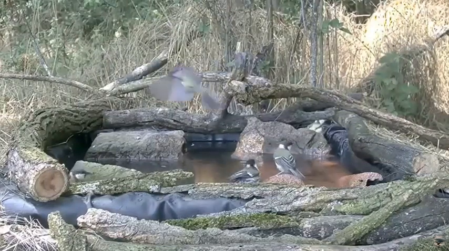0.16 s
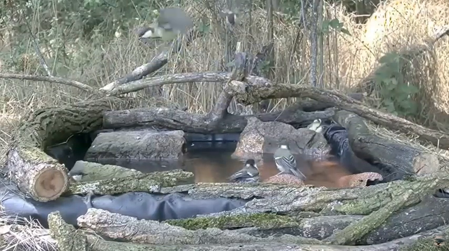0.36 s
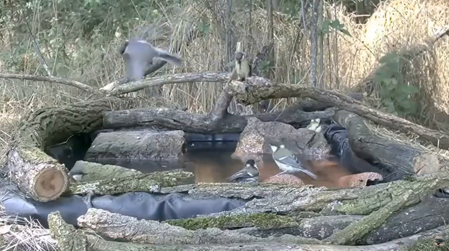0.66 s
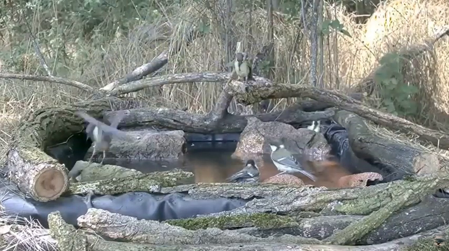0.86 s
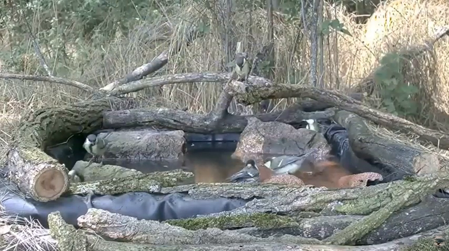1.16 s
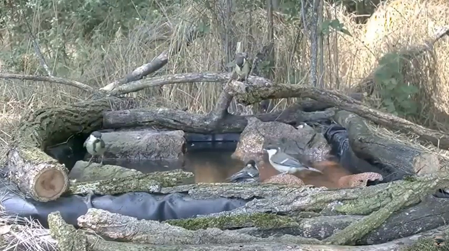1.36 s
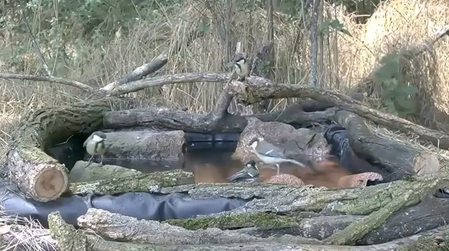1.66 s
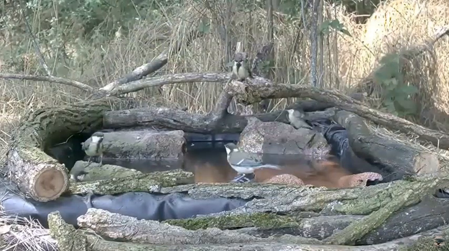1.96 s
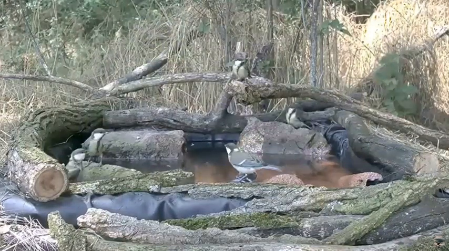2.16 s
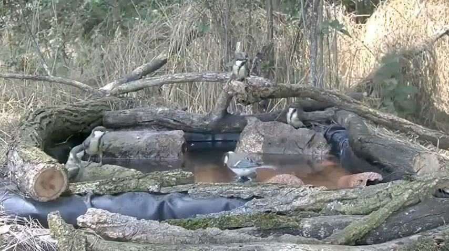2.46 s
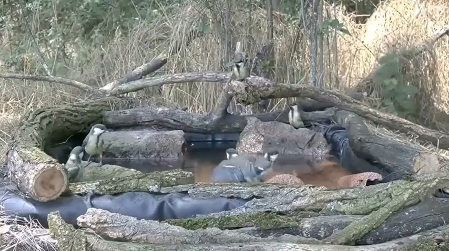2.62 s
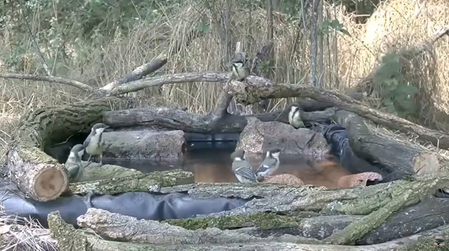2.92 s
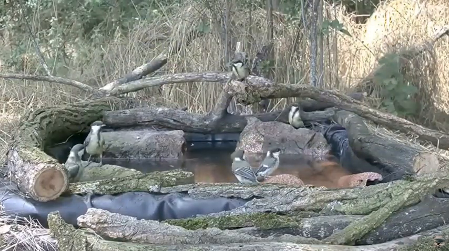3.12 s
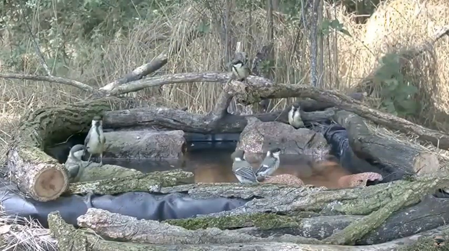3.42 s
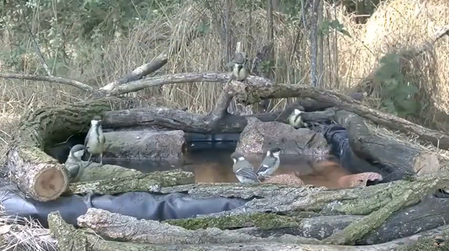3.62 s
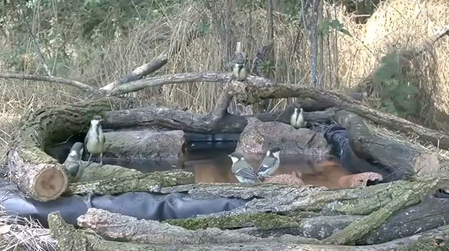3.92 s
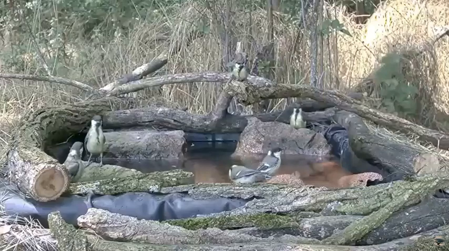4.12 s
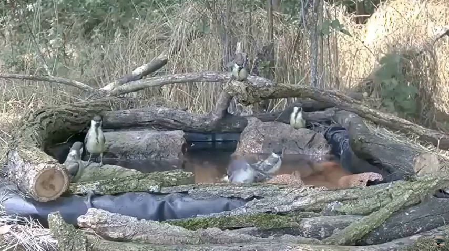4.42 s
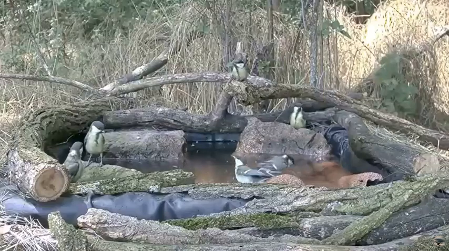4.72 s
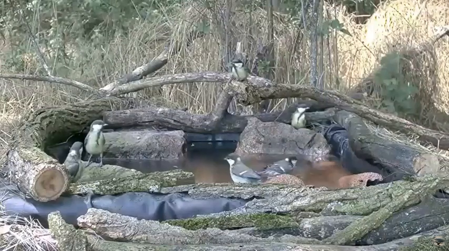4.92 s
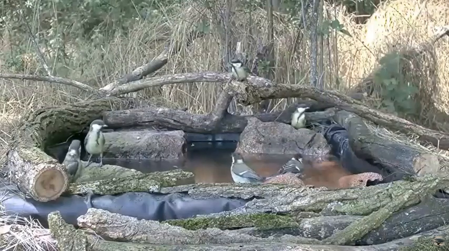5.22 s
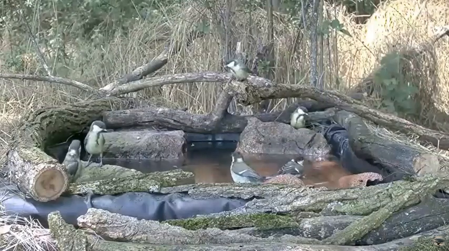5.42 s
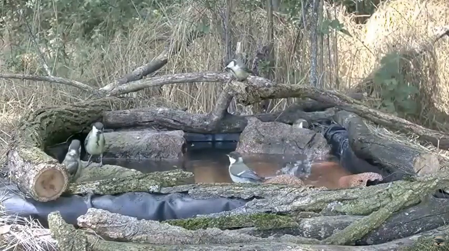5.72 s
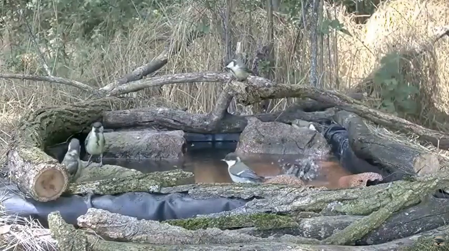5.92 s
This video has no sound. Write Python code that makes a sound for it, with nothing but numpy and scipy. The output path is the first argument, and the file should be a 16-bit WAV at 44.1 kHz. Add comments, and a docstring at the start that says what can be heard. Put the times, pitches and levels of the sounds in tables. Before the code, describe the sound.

Close splashes, drips and whirring wings of small bathing birds, with brief high chirps and faint distant whistles.

```python
"""A shallow garden pool edged with logs, the microphone close to the water. Over a soft distant haze,
small songbirds are bathing from the start: spray and bubbles, puffs and whirrs of wings, splashes,
drops ticking on wood and water. Near 2 s trapped bubbles plink and the first sharp, arched calls come
from close by, scattering in the reeds. From about 4 s other birds whistle far off, and at 6 s a last
flurry of wings passes near the microphone."""
import sys
import numpy as np
from scipy import signal
from scipy.fft import rfft, irfft, next_fast_len
from scipy.io import wavfile
from scipy.ndimage import uniform_filter1d

SR = 44100
rng = np.random.default_rng(int(sys.argv[2]) if len(sys.argv) > 2 else 0)


def to_wav(s):
    """Save 16-bit WAV."""
    ch = np.atleast_2d(s).T  # columns
    pcm = np.round(np.clip(ch, -1, 1) * 32767)  # PCM
    wavfile.write(sys.argv[1], SR, pcm.astype(np.int16))


N = 268112
TIME = np.arange(N) / SR


def from_db(db):
    """Decibels to gain."""
    return 10 ** (np.asarray(db) / 20)


def rms_one(x):
    """Scale to rms 1."""
    return x / np.sqrt(np.mean(x ** 2) + 1e-20)


def band(x, low_hz, high_hz, order=2):
    """Butterworth band-pass."""
    return signal.sosfilt(signal.butter(order, [low_hz, high_hz], "band", fs=SR, output="sos"), x + 1e-18)


def shaped(x, spectrum):
    """Filter by a smooth spectrum with steep ends."""
    hz, level_db = np.transpose(spectrum)
    size = next_fast_len(N, real=True)
    grid = np.maximum(np.fft.rfftfreq(size, 1 / SR), 1)
    gain = from_db(np.interp(np.log(grid), np.log(hz), level_db, left=-90, right=-90))
    return irfft(rfft(x, size) * gain, size)[:N]


def drift(rate_hz):
    """Random wandering with a spread near 1."""
    knots = rng.standard_normal(int(N / SR * rate_hz) + 2)
    return np.interp(TIME * rate_hz, np.arange(len(knots)), knots)


def step(x):
    """Soft step from 0 to 1."""
    return .5 + .5 * np.tanh(x / 2)


def swell(start_s, length_s, attack_s, release_s):
    """Gain that rises exponentially, holds at 1, then dies away."""
    before, after = np.maximum(start_s - TIME, 0), np.maximum(TIME - start_s - length_s, 0)
    return np.exp(-before / attack_s - after / release_s)


def add(track, start_s, sound):
    """Mix a short sound into a track."""
    at = max(round(start_s * SR), 0)
    track[at:at + len(sound)] += sound[:max(N - at, 0)]


# The garden's background spectrum: frequency_hz, gain_db
HAZE_SPECTRUM = [(15, -41), (25, -5), (70, -6.5), (180, 1), (285, 1), (489, -11.5), (734, -11.5),
                 (1040, -18.5), (1400, -19), (2160, -18.5), (5730, -22.5), (7510, -17.5), (12200, -23),
                 (14800, -24.5), (16000, -21.5)]

def haze(level_db=-42.5, sway_db=0.2):
    """Steady hush of air and leaves, far from the microphone."""
    hush = rms_one(shaped(rng.standard_normal(N), HAZE_SPECTRUM))
    return from_db(level_db + sway_db * drift(4.15)) * hush


def droplets(per_s, spread_db):
    """Random impacts of uneven size."""
    sizes = from_db(spread_db * np.minimum(rng.exponential(1, N), 4)) * rng.choice([-1, 1], N)
    return sizes * (rng.random(N) < per_s / SR)


# Spray landing around the pool: frequency_hz, gain_db
SPRAY_SPECTRUM = [(290, -34), (500, -1.5), (729, -1.5), (974, -9.5), (1640, -2.5), (1980, -18), (2810, -4),
                  (3390, -8), (5160, -12), (7530, 0.5), (11500, -8.5), (15100, -12), (16000, -28)]

def spray(level_db, clump_db=5.5):
    """Fine droplets land in clumps, each a tiny crackle."""
    crackle = rms_one(shaped(droplets(per_s=7000, spread_db=0.5), SPRAY_SPECTRUM))
    return from_db(level_db + clump_db * drift(70)) * crackle


def bubbling(level_db, low_hz, high_hz, cycles, per_s, pitches=14):
    """Stirred water traps small bubbles; each rings down by 60 dB over the given cycles."""
    out = np.zeros(N)
    births, pitch_index = droplets(per_s, spread_db=3.5), rng.integers(0, pitches, N)
    for k, hz in enumerate(np.geomspace(low_hz, high_hz, pitches)):
        decay, angle = from_db(-60 * hz / (cycles * SR)), 2 * np.pi * hz / SR
        resonator = [1, -2 * decay * np.cos(angle), decay ** 2]
        out += signal.lfilter([0, np.sin(angle)], resonator, births * (pitch_index == k) + 1e-18)
    return from_db(level_db) * rms_one(out)


# Bouts of bathing in the shallows: start_s, length_s, spray_db, bubbling_db
BATHING_BOUTS = [(0.007, 0.4, -45.5, -49), (.6, 0.11, -46.5, -51), (.94, 0.18, -50, -52),
                 (1.49, 0.34, -53, -55.5), (2.855, .25, -58, -58), (4.506, 0.31, -50, -64),
                 (5.21, 0.19, -48.5, -60), (5.753, 0.34, -46, -61)]

def bathing(attack_s=0.062, settle_s=0.1, wading_spray_db=-57.5, wading_bubbles_db=-58, spatter_db=-7):
    """Above quiet wading, each bout throws spray and churns in bubbles; larger droplets ring high."""
    spray_power, bubble_power = from_db(wading_spray_db) ** 2, from_db(wading_bubbles_db) ** 2
    for start_s, length_s, spray_db, bubbling_db in BATHING_BOUTS:
        effort = swell(start_s, length_s, attack_s, settle_s)
        spray_power += (from_db(spray_db) * effort) ** 2
        bubble_power += (from_db(bubbling_db) * effort) ** 2
    spraying_db, churning_db = 10 * np.log10(spray_power), 10 * np.log10(bubble_power)
    spatter = bubbling(spraying_db + spatter_db, low_hz=6400, high_hz=10400, cycles=58, per_s=120)
    churn = bubbling(churning_db, low_hz=1213, high_hz=2670, cycles=18, per_s=820)
    return spray(spraying_db) + spatter + churn


# Hard wing strokes near the microphone: start_s, strokes, gap_s, level_db, change_per_stroke_db, pitch_hz
WING_FLURRIES = [(0.034, 3, .05, -30, 2.7, 124), (0.525, 2, .076, -21, -7, 153),
                 (1.44, 1, .04, -25, 3, 125), (1.636, 2, .033, -15.5, -2, 94),
                 (1.752, 1, .04, -16.5, 0, 105), (2.398, 1, .04, -25.5, 0, 103),
                 (3.763, 3, .018, -20, 0, 150), (5.405, 3, .038, -20, 2, 111), (6.031, 1, .04, -18, 0, 303),
                 (6.038, 2, .011, -14.5, 6.5, 149)]

def wing_strokes(puff_s=0.0024, swish_db=-15, spread_octaves=0.16):
    """Each close stroke sheds an eddy, a puff of about two cycles."""
    out, t = np.zeros(N), TIME[:SR // 10] - 0.05
    swish = rms_one(band(rng.standard_normal(N), 88, 285))
    for start_s, strokes, gap_s, level_db, change_db, pitch_hz in WING_FLURRIES:
        for k in range(round(strokes)):
            hz = pitch_hz * 2 ** (spread_octaves * rng.standard_normal())
            eddy = np.sin(2 * np.pi * (hz * t + rng.random()))
            eddy += from_db(swish_db) * np.roll(swish, rng.integers(N))[:len(t)]
            puff = from_db(level_db + k * change_db) * eddy / np.cosh(t / puff_s)
            add(out, start_s + k * gap_s + t[0], puff)
    return out


# Short flights around the pool: start_s, length_s, level_db, fade_s
POOL_FLIGHTS = [(0.045, 0.1, -34, .025), (0.51, 0.19, -35.5, 0.045), (1.06, 0.055, -39, 0.1),
                (1.403, 0.16, -37, .05), (1.63, 0.063, -28, .14), (2.134, 0.04, -41, .04),
                (2.364, .06, -41, 0.033), (3.752, 0.039, -33, 0.17), (4.3, .1, -40.5, 0.045),
                (5.21, 0.075, -42, 0.026), (5.43, 0.06, -24.5, 0.019), (6.038, 0.026, -27.5, 0.026)]

def wing_whirr(beat_hz=23, throb=0.4, approach_s=0.031, far_wings_db=-63.5):
    """Feathers push air in a throbbing whirr that builds as a bird nears; far wings never quite stop."""
    beats = 1 + throb * np.sin(2 * np.pi * np.cumsum(beat_hz * (1 + 0.13 * drift(4.6))) / SR)
    rumble = band(rng.standard_normal(N), 27, 141, order=1)
    air = rms_one(band(rumble, 39.4, 290, order=4))
    power = sum((from_db(level_db) * swell(start_s, length_s, approach_s, fade_s)) ** 2
                for start_s, length_s, level_db, fade_s in POOL_FLIGHTS)
    return np.sqrt(power + from_db(far_wings_db) ** 2) * beats * air


def impacts(table, patter_db, patter_t60_s, gain_db, snap_db):
    """Water lands with a knock and a bright snap, then a finer patter; peaks at level_db + gain_db."""
    out, t = np.zeros(N), TIME[:SR // 16]
    patter = from_db(patter_db - 60 * t / patter_t60_s) * rng.standard_normal((len(table), len(t)))
    hits = (t == 0) + patter
    tops = band(hits, 6900, 8800, order=1) + from_db(snap_db) * band(hits, 6900, 12400, order=1)
    knocks = band(hits, 1150, 2800)
    for (start_s, level_db, knock_db), top, knock in zip(table, tops, knocks):
        sound = top + from_db(knock_db) * knock
        add(out, start_s, from_db(level_db + gain_db) * sound / np.max(np.abs(sound)))
    return out


# The strongest splashes in the pool: start_s, level_db, knock_db
WING_SPLASHES = [(0.0487, -22, -12), (0.1925, -25, 3), (0.3273, -18, -3), (0.6125, -23, -9),
                 (0.9453, -21, -6), (0.9932, -21, -4), (1.103, -21, -1), (1.509, -21, -5),
                 (1.5662, -23.5, -1), (1.738, -22, -7), (4.134, -27, -7), (4.1924, -22.5, -4),
                 (4.502, -18, -2), (5.393, -27, 6), (5.8886, -16, -5), (6.019, -14, -11)]

def splashes():
    """A wing flick throws water that lands in a dense patter."""
    return impacts(WING_SPLASHES, patter_db=-3, patter_t60_s=0.029, gain_db=-6, snap_db=-30)


# Single drops on the logs and the water: start_s, level_db, knock_db
DROP_TICKS = [(.1197, -15.5, -3), (.3796, -20, 2), (2.198, -32, 18), (5.2054, -9.5, 6.5), (5.7553, -13, 0),
              (5.8836, -15.5, -25)]

def ticks():
    """A hard drop snaps, with little patter after it."""
    return impacts(DROP_TICKS, patter_db=-26.5, patter_t60_s=0.024, gain_db=3.5, snap_db=-1.5)


# Air bubbles trapped by drops in the pool: start_s, pitch_hz, level_db, t60_s
BUBBLE_PLINKS = [(1.908, 1440, -12, 0.0091), (1.9099, 1160, -27, 0.025), (2.294, 1860, -40, 0.038),
                 (3.212, 1860, -42, 0.087), (3.436, 1770, -40.5, 0.057), (4.133, 1360, -37, .05),
                 (4.57, 1830, -27, 0.04), (5.172, 1600, -34.5, 0.06), (5.183, 1510, -33, 0.062),
                 (5.2059, 725, -21, 0.061), (5.203, 1005, -22, 0.04), (6.042, 3110, -30, 0.024),
                 (6.052, 1412, -16, 0.053)]

def plinks(sag=0.16, settle_s=0.0013, attack_s=0.00012):
    """Each bubble rings as a damped tone that settles onto its pitch."""
    out, t = np.zeros(N), TIME[:SR // 8]
    for start_s, pitch_hz, level_db, t60_s in BUBBLE_PLINKS:
        phase = 2 * np.pi * np.cumsum(pitch_hz * (1 + sag * np.exp(-t / settle_s))) / SR
        envelope = from_db(level_db - 60 * t / t60_s) * (1 - np.exp(-t / attack_s))
        add(out, start_s, envelope * np.sin(phase))
    return out


# Tone colour of the calls at the microphone, brightest from 6.5 to 10 kHz: frequency_hz, gain_db
CALL_COLOUR = [(1400, -16), (2100, -23.5), (3200, -21.5), (4200, -18), (5300, -21), (6000, -12.5),
               (6700, -4.5), (7400, 3.5), (8400, -1), (9300, -1.5), (10200, -5), (12000, -15.5),
               (16000, -21)]
# The rasp that opens each call: frequency_hz, gain_db
RASP_SPECTRUM = [(1500, -7), (2200, -7), (3300, 5.5), (4300, -2.5), (5400, -10), (6700, 9), (8000, 3),
                 (9300, 10.5), (10500, -6.5), (12500, -7), (16000, -29)]
# Thin poolside stems scatter short waves best: frequency_hz, gain_db
REED_SPECTRUM = [(1400, -15), (5000, 2), (7000, -2.5), (8200, -2), (9200, 2), (11000, 0), (16000, -6)]
# Calls close to the microphone, levels ahead of the filters above:
# upsweep_at_s, downsweep_at_s, rise_s, fall_s, top_hz, level_db, fade_db, opening_db, rasp_db, reeds_db
CLOSE_CALLS = [(1.929, 1.9587, 0.0044, 0.0022, 9390, -3.5, -1, -1, -18, -13),
               (1.9986, 2.027, 0.0047, 0.0024, 9010, 0.5, -12.5, -9.5, -22.5, -9.5),
               (2.603, 2.647, 0.0026, .002, 7820, -24, -10, -4, -16, -12),
               (2.6454, 2.676, 0.0021, 0.0018, 8760, -3.5, -2.5, 1, -19.5, -12),
               (3.682, 3.737, 0.0029, 0.0021, 7770, -28.5, -12.5, 2, -18.5, -1.5),
               (4.81, 4.837, 0.0018, .0014, 8100, -6, -9.5, 5.5, -11, -14.5),
               (4.888, 4.916, 0.0023, 0.00123, 8190, -7.5, 3, -5, -8, -15)]

def close_calls(rest_hz=2000, climb=0.041, jitter=0.073, overtone_db=-13, purity=0.23, held_rasp_db=-20,
                lead_s=0.0089, attack_s=0.0041, release_s=0.0027):
    """The syrinx sweeps an arch, rough while low, clear on top. Returns direct and reed-bound sound."""
    voice, rasp, reed_share = np.zeros((3, N))
    for up_s, down_s, rise_s, fall_s, top_hz, level_db, fade_db, opening_db, rasp_db, reeds_db in CLOSE_CALLS:
        t = up_s - .03 + TIME[:SR // 8]
        risen, held = step((t - up_s) / rise_s), step((down_s - t) / fall_s)
        progress = np.clip((t - up_s) / (down_s - up_s), 0, 1)
        crest_hz = top_hz * (1 + climb * (progress - .75))   # the top of the arch creeps up
        hz = rest_hz + (crest_hz - rest_hz) * risen * held
        opening = (1 - risen) ** 2
        shake = rms_one(uniform_filter1d(rng.standard_normal(len(t)), size=24))
        phase = 2 * np.pi * np.cumsum(hz * (1 + jitter * shake * opening)) / SR
        sounding = step((t - up_s + lead_s) / attack_s) * step((down_s + 0.001 - t) / release_s)
        effort = from_db(level_db + fade_db * progress + opening_db * opening) * sounding
        overtones = sum(np.sin(k * phase) * (k * hz < SR / 2) for k in range(2, 5))
        overtones *= from_db(overtone_db) * (1 - purity * risen * held)
        add(voice, t[0], effort * (np.sin(phase) + overtones))
        roughness = from_db(level_db + rasp_db) * sounding * (1 - risen + from_db(held_rasp_db))
        add(rasp, t[0], roughness * rng.standard_normal(len(t)))
        reed_share[round(t[0] * SR):] = from_db(reeds_db)   # depends on where the bird is facing
    direct = shaped(voice, CALL_COLOUR) + shaped(rasp, RASP_SPECTRUM)
    return direct, shaped(direct * reed_share, REED_SPECTRUM)


# Reflections off nearby water and stones: delay_s, gain_db
POOL_ECHOES = [(.0014, -16), (.0031, -12)]

def pool_echoes(calls):
    """Calls bounce and reach the microphone just behind the direct sound."""
    out = np.zeros(N)
    for delay_s, gain_db in POOL_ECHOES:
        add(out, delay_s, from_db(gain_db) * calls)
    return out


# Birds far from the pool: start_s, length_s, start_hz, target_hz, glide_s, waver_share, level_db
FAR_WHISTLES = [(3.91, 0.083, 2093, 2450, 0.043, .015, -53), (4.049, 0.3, 2760, 1980, 0.34, .012, -54.5),
                (4.661, 0.11, 2730, 4520, 0.011, 0.0135, -36.5),
                (4.842, 0.07, 4530, 4370, 0.047, 0.014, -38), (5.674, 0.39, 3320, 3000, 0.038, 0.092, -48)]

def far_whistles():
    """Thin wavering tones that slide towards a held pitch."""
    out = np.zeros(N)
    for start_s, length_s, start_hz, target_hz, glide_s, waver, level_db in FAR_WHISTLES:
        t = TIME[:int(length_s * SR)]
        shake = rms_one(uniform_filter1d(rng.standard_normal(SR // 2), size=150))[:len(t)]
        hz = (target_hz + (start_hz - target_hz) * np.exp(-t / glide_s)) * (1 + waver * shake)
        envelope = from_db(level_db) * np.sqrt(np.sin(np.pi * (t / length_s) ** 0.55))
        add(out, start_s, envelope * np.sin(2 * np.pi * np.cumsum(hz) / SR))
    return out


def foliage(x, t60_s, onset_s):
    """Diffuse scatter from the surrounding reeds and trees builds up, then dies."""
    t = TIME[:SR]
    tail = rng.standard_normal(SR) * from_db(-60 * t / t60_s) * (1 - np.exp(-t / onset_s))
    return signal.fftconvolve(x, tail / np.sqrt(np.sum(tail ** 2)))[:N]


def scene():
    """One microphone at the pool's edge: the water is close and fairly dry, far birds much scattered."""
    water = bathing() + splashes() + ticks() + plinks()
    water += from_db(-8) * foliage(water, t60_s=0.067, onset_s=0.0043)
    calls, into_reeds = close_calls()
    calls += pool_echoes(calls) + foliage(into_reeds, t60_s=0.26, onset_s=0.0022)
    whistles = far_whistles()
    whistles += from_db(-3.5) * foliage(whistles, t60_s=0.4, onset_s=0.0075)
    return (haze() + water + wing_strokes() + wing_whirr() + calls + whistles)[None]


def record(dry, cutoff_hz=16100):
    """The loudest peaks are capped and the top treble is cut."""
    low_pass = signal.ellip(10, .1, 90, cutoff_hz, fs=SR, output="sos")
    return signal.sosfilt(low_pass, np.clip(dry, -1, 1))


dry = scene()
out = record(dry)
to_wav(out)
```